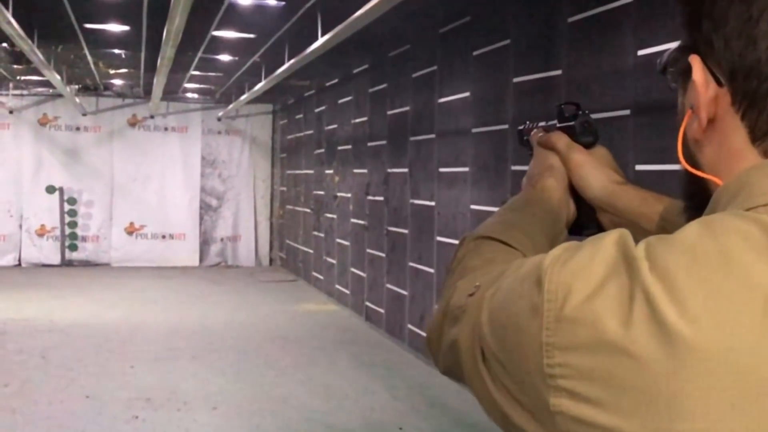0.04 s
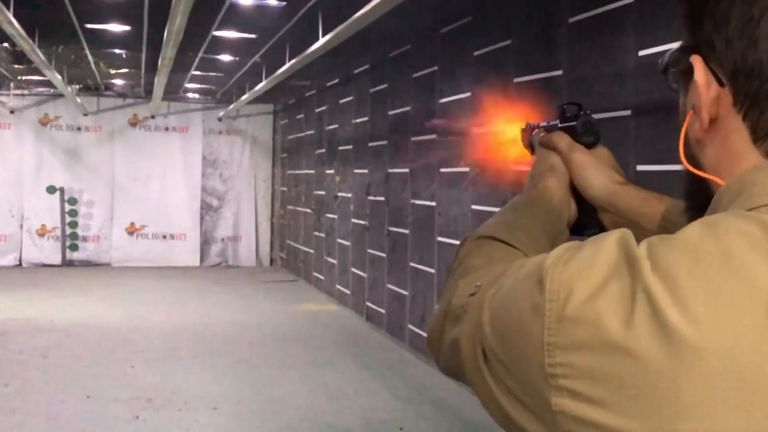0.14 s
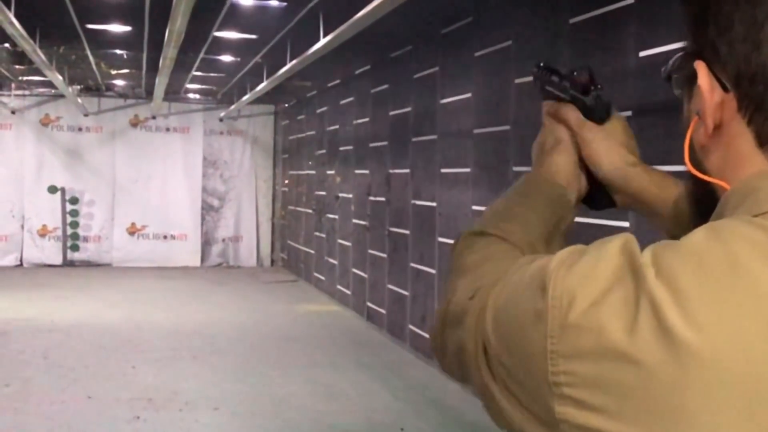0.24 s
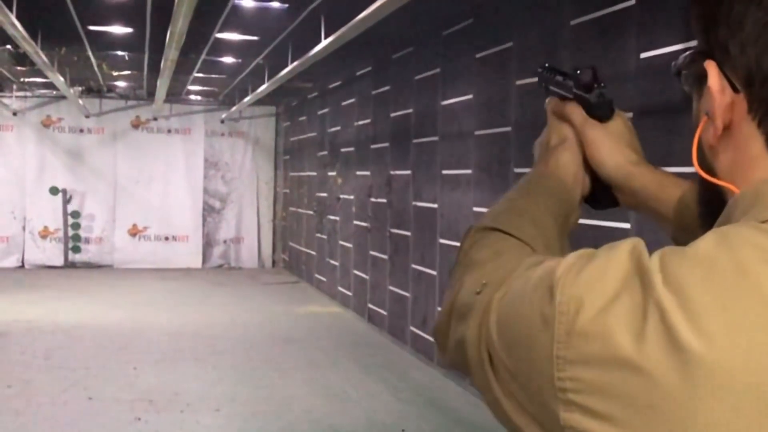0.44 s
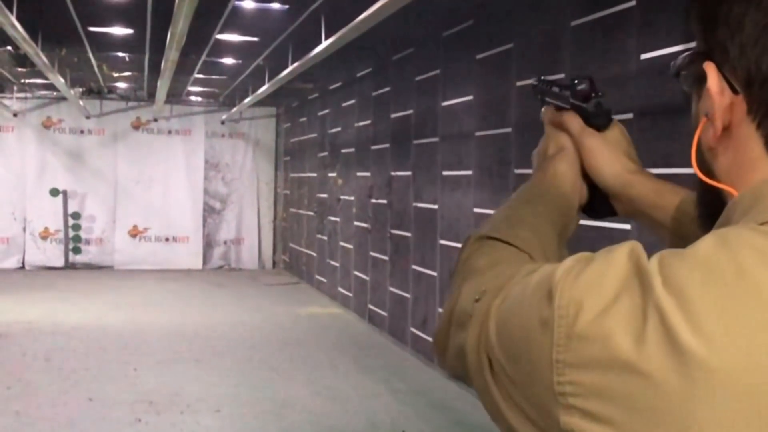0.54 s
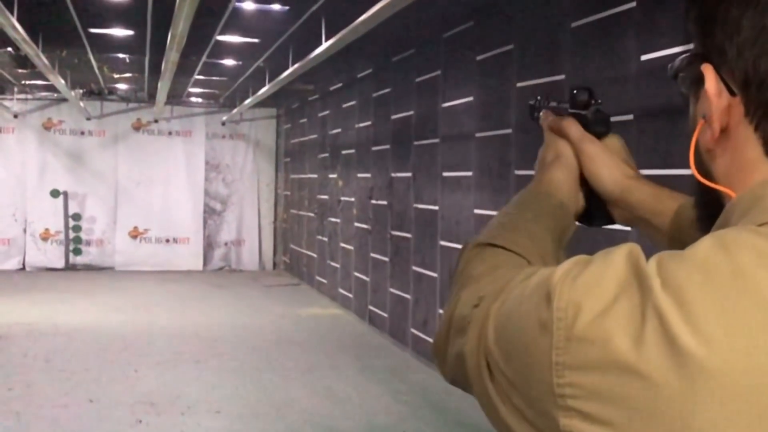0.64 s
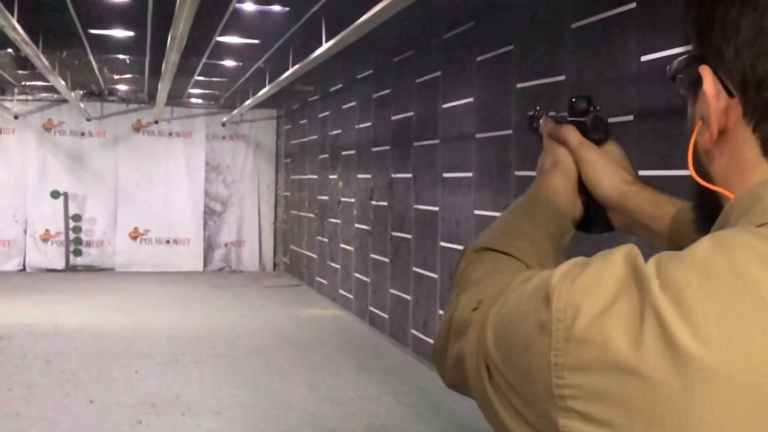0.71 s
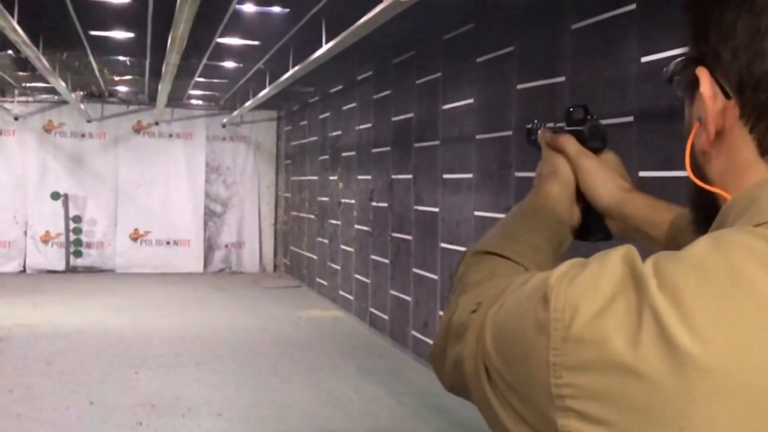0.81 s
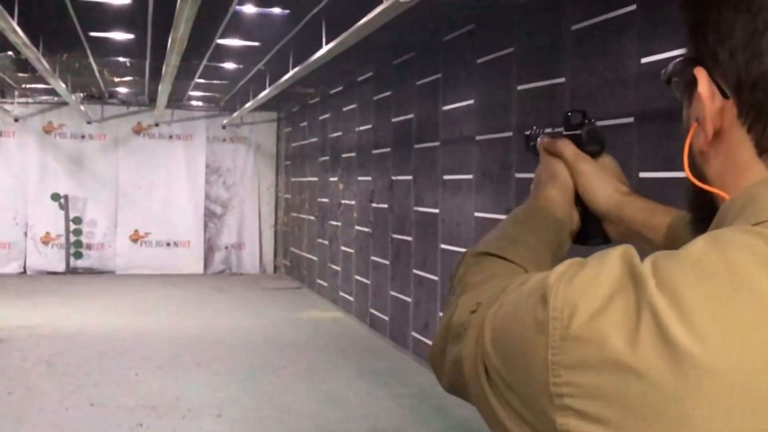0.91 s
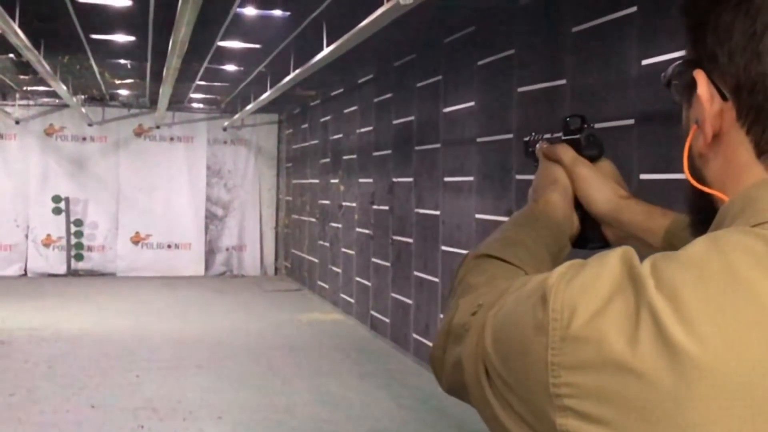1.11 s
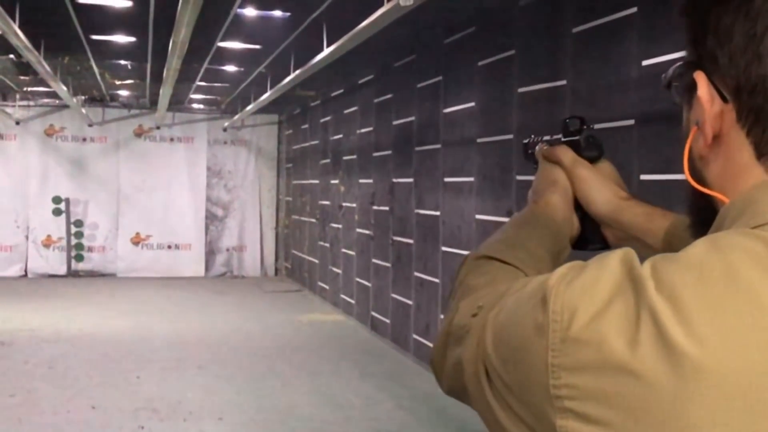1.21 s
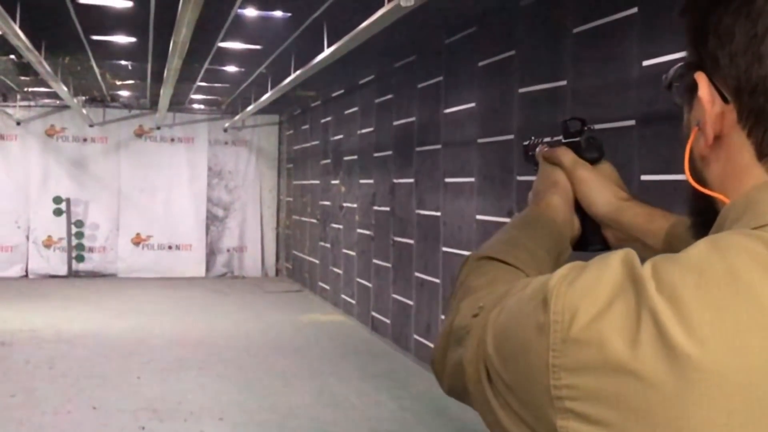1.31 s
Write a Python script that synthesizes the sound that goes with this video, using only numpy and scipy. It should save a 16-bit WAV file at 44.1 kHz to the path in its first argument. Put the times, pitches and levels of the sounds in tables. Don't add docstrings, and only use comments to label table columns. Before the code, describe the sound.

One overloaded pistol shot in a long concrete range, with slapping echoes and a metallic ping

```python
import sys
import numpy as np
from scipy import signal
from scipy.fft import rfft, irfft
from scipy.io import wavfile
from scipy.ndimage import uniform_filter1d

SR = 44100
rng = np.random.default_rng(int(sys.argv[2]) if len(sys.argv) > 2 else 0)


def linear_from_db(decibels):
    return 10 ** (np.asarray(decibels, float) / 20)


def unload_audio(sound):
    columns = np.transpose(np.atleast_2d(sound))
    steps = np.round(np.clip(columns, -1, 1) * 32767)
    wavfile.write(sys.argv[1], SR, steps.astype(np.int16))


N = 59535


def read(points, hz):
    f, value = np.transpose(points)
    return np.interp(np.log(hz + 1), np.log(f + 1), value)


# (frequency [Hz], density [dB per Hz])
AIR = [(4.7, -31.5), (8.0, 5), (36, -8), (57, -20), (87, -31), (780, -51.5), (914, -59.5), (2160, -60),
       (16000, -83)]


def air():
    spectrum = rfft(rng.standard_normal(N))
    hz = np.fft.rfftfreq(N, 1 / SR)
    x = irfft(spectrum * linear_from_db(read(AIR, hz)), N)
    return linear_from_db(-38) * x / x.std()


def arrival(s, db, colour, t60, lag_cycles=1.6, grain_db=-1.0):
    size = 30000
    start = round(s * SR)
    t = np.arange(min(N - start, size)) / SR

    taps = rng.standard_normal(size)
    clumps = uniform_filter1d(rng.standard_normal(size), size=64) * 13
    taps = taps * linear_from_db(grain_db * clumps)

    hz = np.fft.rfftfreq(size, 1 / SR)
    spectrum = rfft(taps) * linear_from_db(read(colour, hz)) / np.sqrt(hz + 30)
    spectrum /= np.sqrt(np.mean(irfft(spectrum) ** 2))

    out = np.zeros(N)
    for step in range(19):
        centre = 30 * 2 ** (step / 2)
        window = np.clip(1 - abs(2 * np.log2((hz + 1) / centre)), 0, 1)
        band = irfft(spectrum * window)[:len(t)]
        life = read(t60, centre) if np.ndim(t60) else t60
        swell = 1 - np.exp(-(t * centre / lag_cycles) ** 2)
        out[start:start + len(t)] += band * swell * linear_from_db(-60 * t / life)
    return linear_from_db(db) * out


# (frequency [Hz], level [dB])
BLAST = [(40, -22.5), (100, -13), (250, -3), (600, 0), (1500, -2.5), (4000, -17.5), (9000, -20),
         (16000, -32)]
# (frequency [Hz], decay time T60 [s])
BLAST_T60 = [(60, 0.42), (250, 0.21), (700, 0.17), (2000, 0.21), (6000, 0.21), (14000, .25)]
# (frequency [Hz], level [dB])
CRACK = [(500, -27.5), (1500, -3.5), (4000, -0.5), (9000, -10.5), (16000, -19)]
# (time [s], level [dB])
WALL_SLAPS = [
    (0.293, -5.5),
    (0.337, -5),
    (0.35, -15.5),
]
# (frequency [Hz], level [dB])
HALL = [(100, -14), (400, -6.5), (1000, -0.5), (2500, 0), (5000, -7.5), (12000, -23.5)]


def shot():
    shot_s = .2456
    out = arrival(shot_s, 11.5, CRACK, t60=0.037, lag_cycles=1.0)
    out += arrival(shot_s, 13, BLAST, BLAST_T60, lag_cycles=3.3)
    for s, db in WALL_SLAPS:
        out += arrival(s, db, BLAST, t60=.06, lag_cycles=1.2)
    return out + arrival(shot_s, -17, HALL, t60=0.86)


# (frequency [Hz], level [dB])
RETURN = [(30, -18), (100, -22), (300, -13.5), (550, 1), (2000, -1), (4000, -4), (9000, -6.5), (16000, -17)]
# (frequency [Hz], decay time T60 [s])
RETURN_T60 = [(60, 0.094), (300, 0.23), (700, 0.15), (2000, 0.19), (6000, 0.13), (14000, 0.17)]
# (time [s], level [dB], decay time T60 [s])
FLUTTER = [
    (.5355, -3, 0.033),
    (.5575, -10.5, 0.07),
    (.684, -30.5, 0.068),
    (.706, -24, 0.033),
    (.795, -54.5, 0.13),
    (.855, -53, 0.094),
]
# (frequency [Hz], level [dB])
LANE = [(300, -38), (480, -17), (700, 10), (1200, -23), (1900, 5), (3200, -14), (8000, -16), (16000, -36)]


def far_wall():
    lead_s, lead_db, lead_hz = 0.35, -5, 1945
    t = np.maximum(np.arange(N) / SR - lead_s, 0)
    envelope = (t / .005) * np.exp(1 - (t / 0.0027) ** 2)
    lead = linear_from_db(lead_db) * envelope * np.sin(2 * np.pi * lead_hz * t)

    out = lead + arrival(.3838, 2.5, RETURN, RETURN_T60, lag_cycles=2.2)
    for s, db, t60 in FLUTTER:
        out += arrival(s, db, LANE, t60, lag_cycles=2.3, grain_db=2.0)
        out += arrival(s, db - 14.5, HALL, t60=0.19)
    return out


# (frequency [Hz], level [dB], decay time T60 [s], gap to twin mode [Hz])
PLATE = [(2153, -2.5, 0.41, 8.5), (3704, -18.5, .5, 15.5), (4455, -9, .3, 6.5), (5023, -6.5, 0.48, -19.5),
         (5996, -14, 0.51, 10), (6500, -16.5, .4, 6.5), (7709, -9.5, 0.27, 11), (7846, 0.5, 0.43, 37.5),
         (7990, -14, .45, 8), (8230, -10, .5, 9), (8845, -5.5, .35, 42), (9020, -16, 0.34, 9.5),
         (10360, -14.5, .25, 17.5), (11440, -7.5, .3, 18)]


def plate():
    strike_s, rise_s, twin_db, wet_gain = .386, 0.017, -4.5, 0.65
    t = np.maximum(np.arange(N) / SR - strike_s, 0)
    phases = 2 * np.pi * rng.random((len(PLATE), 2))
    ring = np.zeros(N)
    for (hz, db, t60, gap), (phase, twin_phase) in zip(PLATE, phases):
        mode = np.sin(2 * np.pi * hz * t + phase)
        twin = np.sin(2 * np.pi * (hz + gap) * t + twin_phase)
        ring += linear_from_db(db - 60 * t / t60) * (mode + linear_from_db(twin_db) * twin)
    ring *= 1 - np.exp(-t / rise_s)

    lane = rng.standard_normal(6000) * linear_from_db(-60 * np.arange(6000) / SR / 0.18)
    wet = signal.fftconvolve(ring, lane)[:N] / np.linalg.norm(lane)
    return linear_from_db(-13) * (ring + wet_gain * wet)


# (time [s], level [dB], decay time T60 [s])
KNOCKS = [
    (.978, -60.5, .03),
    (1.013, -55.5, 0.033),
    (1.0478, -37.5, 0.04),
    (1.208, -62, 0.038),
    (1.302, -50, 0.16),
    (1.335, -48, .1),
]
# (frequency [Hz], level [dB])
RACK = [(80, -32), (150, -10), (450, -1.5), (900, -10), (1800, 5.5), (2700, -3.5), (5000, -13),
        (12000, -29.5)]


def rack():
    out = np.zeros(N)
    for s, db, t60 in KNOCKS:
        out += arrival(s, db, RACK, t60, lag_cycles=0.24)
        out += arrival(s + 0.0017, db - 11, HALL, t60=0.198)
    return out


def scene():
    return (shot() + far_wall() + plate() + rack() + air())[None]


def band_limit(x):
    return signal.sosfilt(signal.butter(12, 16450, fs=SR, output="sos"), x)


def record(dry):
    ceiling, knee, droop_hz = 0.79, 3.0, 40
    flat = dry / (1 + abs(dry / ceiling) ** knee) ** (1 / knee)
    pole = np.exp(-2 * np.pi * droop_hz / SR)
    overload = flat - dry.clip(-.1, .1)
    slow = signal.lfilter([1 - pole], [1, -pole], overload)
    mix = np.clip(flat - 0.16 * slow, -1, 1)
    return band_limit(mix)


dry = scene()
out = record(dry)
unload_audio(out)
```